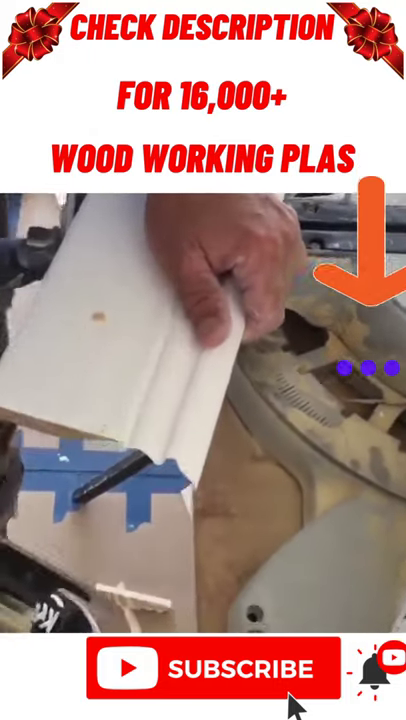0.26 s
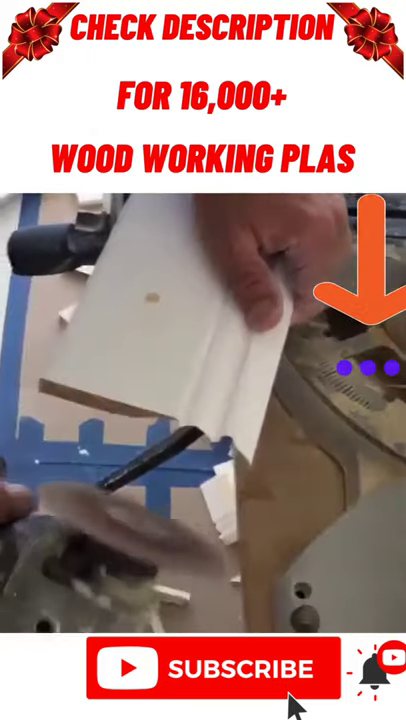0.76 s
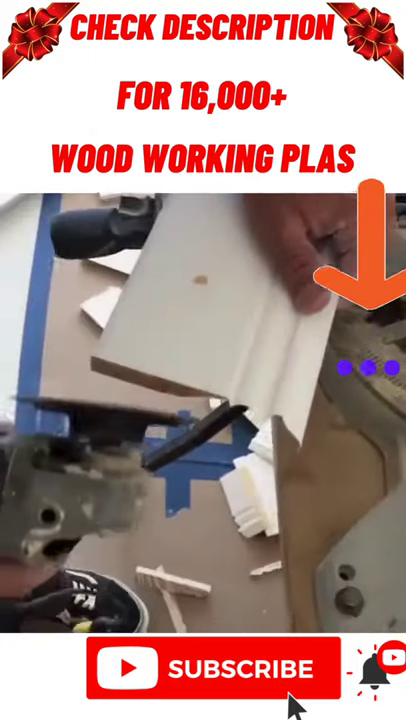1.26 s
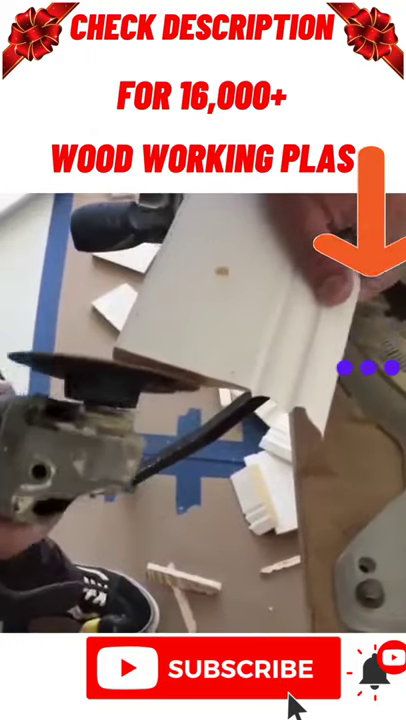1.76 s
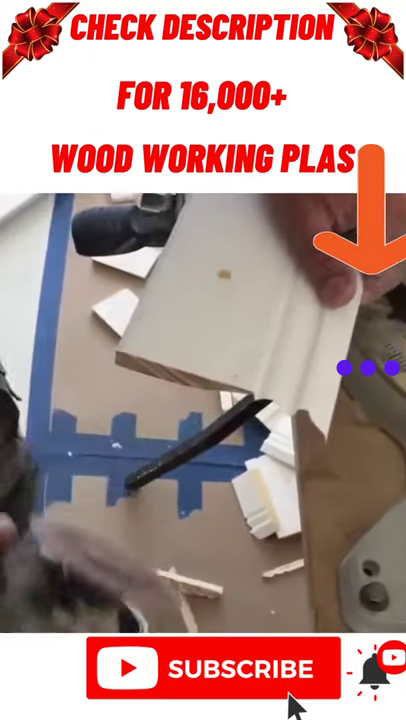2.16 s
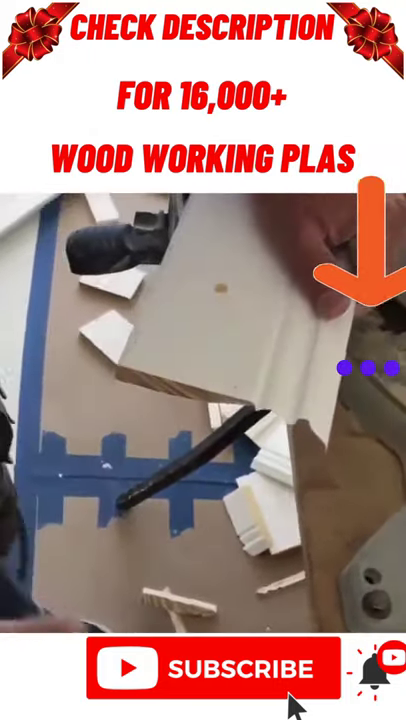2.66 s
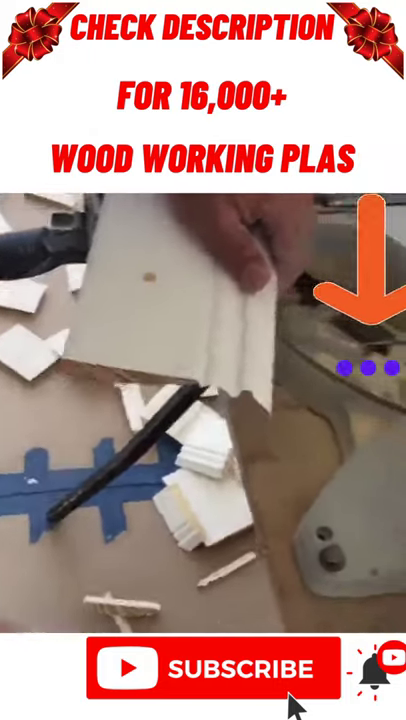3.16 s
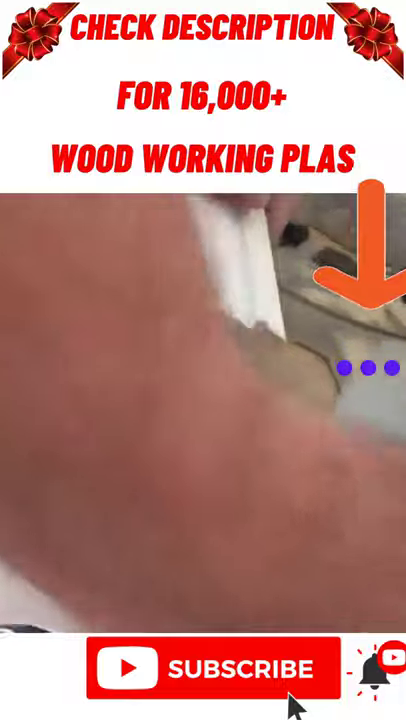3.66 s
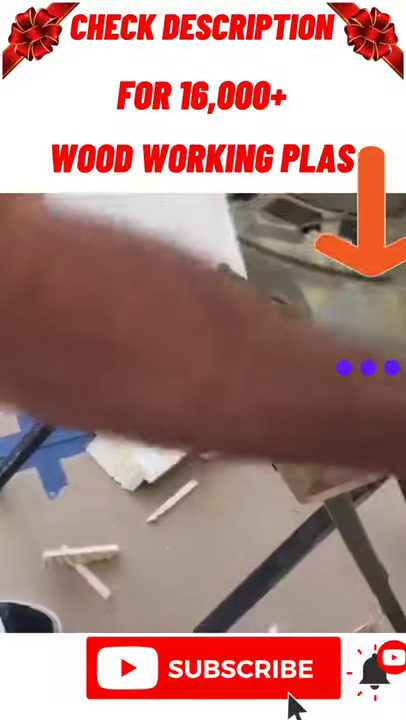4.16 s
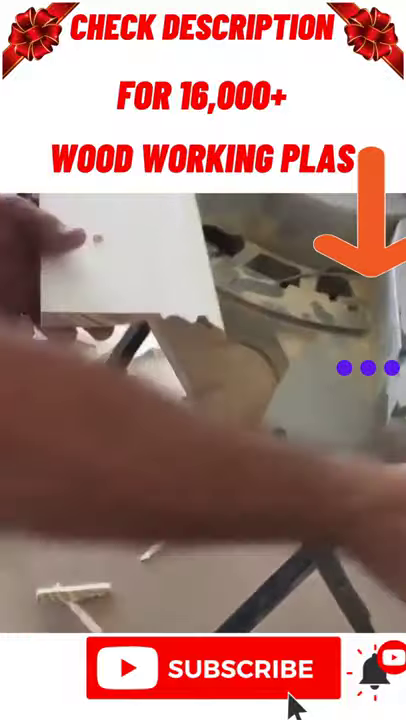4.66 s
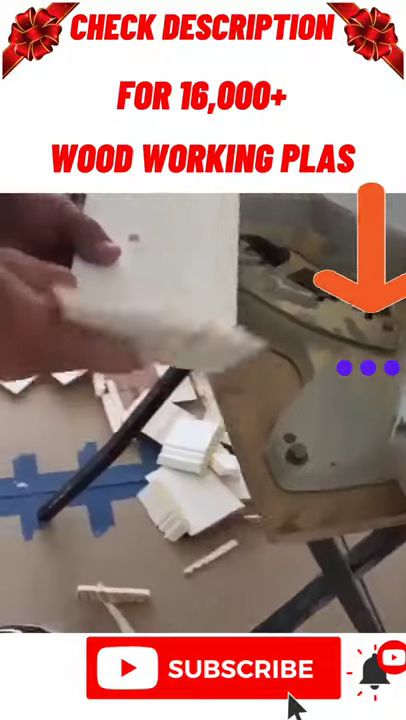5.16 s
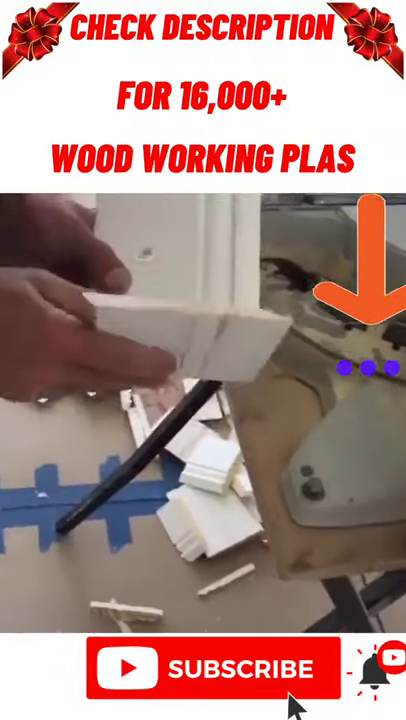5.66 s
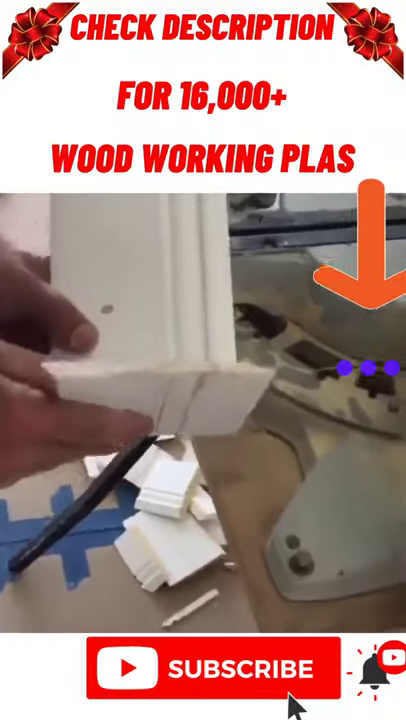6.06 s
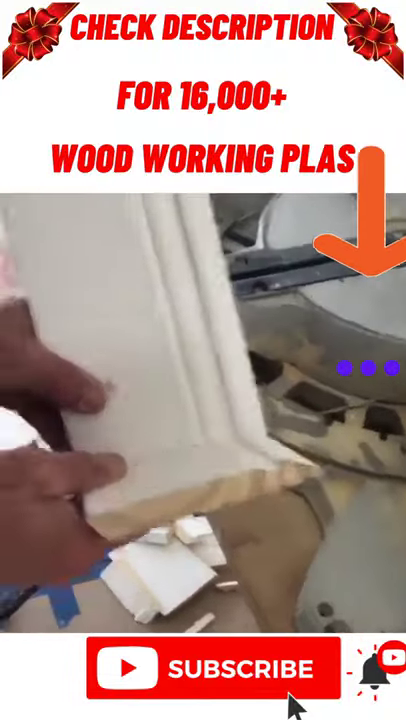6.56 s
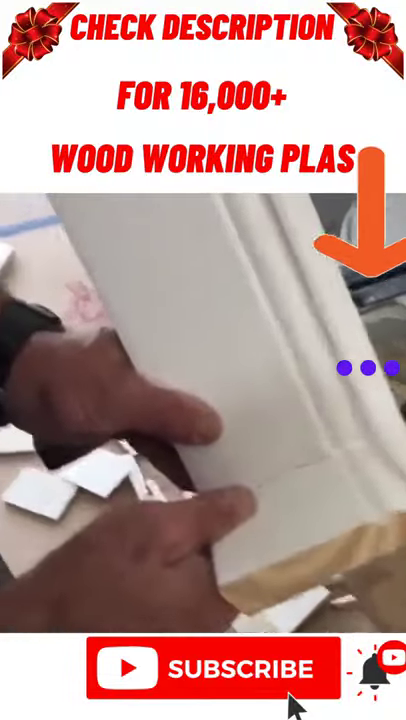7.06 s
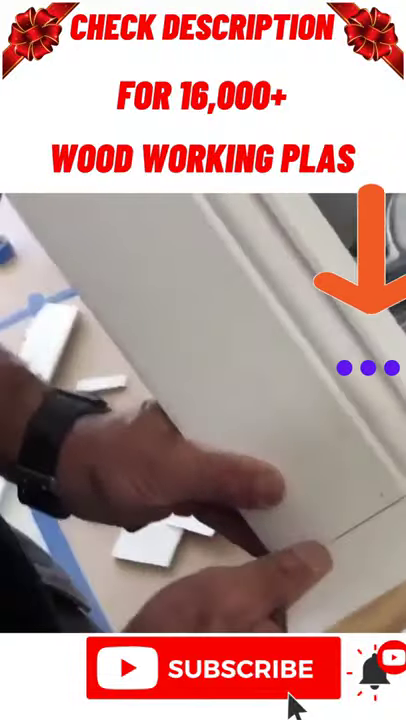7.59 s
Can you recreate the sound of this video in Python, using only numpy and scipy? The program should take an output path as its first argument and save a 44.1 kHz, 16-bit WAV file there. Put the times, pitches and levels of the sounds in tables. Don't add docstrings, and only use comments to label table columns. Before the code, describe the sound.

An airy motor roar with gear whine descends steadily, interrupted by a brief gritty, chattering scrape of disc on wood. Slowing pulses and loose ticks follow until the tool clunks down on a bench and dies. The rest is quiet: faint scrapes, one sharp resonant wood knock, softer taps and dry rustling. Close handheld stereo pickup in a hard, reverberant room, with soft low wind bumps throughout.

```python
import sys
import numpy as np
from scipy import signal
from scipy.fft import rfft, irfft, next_fast_len
from scipy.io import wavfile
from scipy.ndimage import uniform_filter1d, map_coordinates

SR = 44100
rng = np.random.default_rng(int(sys.argv[2]) if len(sys.argv) > 2 else 0)


def undo_db(level):
    steps = np.asarray(level, float) / 20
    return 10 ** steps


def generate_wav(signal):
    frames = np.transpose(np.atleast_2d(signal))
    scaled = np.clip(frames, -1, 1) * 32767
    pcm = np.round(scaled).astype(np.int16)
    wavfile.write(sys.argv[1], SR, pcm)


N = 345152

# t/s, turns per second
DISC_SPEED = [
    (0, 137),
    (1.47, 60.2),
    (1.77, 55),
    (2.5, 34),
    (3.2, 16.7),
]
# f/Hz, level/dB per Hz
FACING = [(470, -45), (800, -15.5), (936, -21), (1140, -3.5), (1350, -7), (1640, -4.5), (1910, -1),
          (2180, -4.5), (2740, -11.5), (3200, -20.5), (4160, -44.5), (7040, -120)]
TURNED = [(470, -41), (800, -8.5), (952, -15), (1330, -6), (1450, -7.5), (1750, -5), (2140, -3),
          (2340, -6.5), (2810, -9), (3510, -10), (4200, -13), (5460, -38), (9240, -120)]
# f/Hz, level/dB per Hz
FAN = [(1650, -26), (2800, -2), (4290, -0.5), (6630, -5.5), (10200, -8), (12300, -8.5), (13100, -13),
       (13500, -34)]
HUM = [(150, -33), (250, -4.5), (388, -12.5), (626, -5.5), (1100, -3.5), (1430, -15.5), (2420, -120)]
# t/s, level/dB
NEAR = [(0, 2.2), (.36, 3.5), (.65, 1.5), (.95, 2), (1.05, 0.5), (1.42, 1), (1.9, -2), (2.05, -1), (2.5, 4),
        (2.8, 5.5), (3.0, 3), (3.19, 0.5)]
# t/s, angle/rad
SWING = [(1.0, 0.00072), (2.4, np.pi / 2)]
# t/s, level/dB
STOP = [(3.2, -2.06), (3.35, -36), (3.6, -100.5)]
# f/Hz, width/Hz, level/dB
GUARD = [(1920, 80, 2.4)]
SHELL = [(1770, 180, 5), (2026, 90, 3), (2380, 160, 6), (3370, 240, -1.5)]
# f/Hz, level/dB
WINDOW = [(3150, -16), (3600, 0), (4300, -1), (4850, 1.5), (5450, -4), (5900, -20), (6600, -29.5),
          (7600, -10), (8200, -31)]
# t/s, level/dB, f/Hz, length/s
STREAKS = [(2.004, -31, 3150, 0.12), (2.246, -44, 1980, 0.14), (2.3, -29, 5300, 0.12),
           (2.318, -27, 3530, 0.07), (2.377, -26, 2230, 0.19), (2.44, -27, 5370, 0.18),
           (2.42, -30, 2540, 0.12), (2.463, -45, 3000, 0.15), (2.653, -35, 2380, 0.14),
           (2.695, -33, 4030, 0.09), (2.843, -36, 5500, 0.11), (2.892, -27, 2380, 0.078),
           (1.958, -23, 1890, 0.098), (2.164, -44, 5100, 0.073), (2.367, -31, 6400, 0.08),
           (2.527, -28, 2400, 0.16), (2.752, -35, 2300, 0.15), (2.9, -31, 3250, 0.097),
           (3.04, -43, 2280, 0.16)]
# t/s, level/dB, hold/s
GUSTS = [(0.013, -22.5, 0.1), (0.497, -17, 0.11), (0.73, -29, 0.0072), (1.068, -33, 0.0091),
         (1.25, -39, 0.46), (2.018, -36.5, 0.02), (2.178, -34.5, 0.12), (2.72, -40, 0.03),
         (3.01, -38.5, 0.035), (3.28, -33.5, 0.25), (3.825, -40.5, 0.087), (4.139, -28, 0.039),
         (4.383, -32.5, 0.21), (4.705, -21, 0.034), (4.846, -24.5, 0.11), (5.067, -32, 0.15),
         (5.326, -19.5, 0.055), (5.466, -44, 0.32), (5.918, -29.5, 0.016), (6.09, -26, 0.032),
         (6.259, -38.5, 0.037), (6.466, -43, 0.11), (6.68, -34, 0.14), (6.911, -36.5, 0.26),
         (7.296, -23.5, 0.034), (7.368, -20.5, 0.064), (7.442, -16, 0.056), (7.597, -42.5, 0.16)]
# t/s, peak level/dB, f/Hz
PUFFS = [(0.062, -18, 117.7), (0.496, -14.5, 100), (0.567, -13, 178), (0.722, -23, 101),
         (1.25, -30.5, 85.4), (2.049, -28.5, 117), (3.25, -20, 174), (4.406, -26, 98.2),
         (4.455, -25.5, 141.3), (4.517, -25, 166), (4.695, -22.5, 92.7), (4.768, -16, 73),
         (4.844, -21, 116), (4.927, -20, 116.6), (5.133, -25, 107), (5.201, -28.5, 112),
         (5.308, -17, 123.8), (5.403, -23, 78.3), (6.073, -25, 113.6), (6.107, -21, 63.7),
         (6.251, -26, 132.5), (6.767, -31, 82.4), (7.12, -31.5, 79.4), (7.212, -26.5, 73.6),
         (7.273, -22, 121.9), (7.313, -21, 99.6), (7.377, -21, 100), (7.453, -22, 142), (7.519, -17, 103),
         (7.559, -18, 97.3)]
# t/s, peak level/dB
FLAPS = [(0.058, -22), (0.499, -20.5), (0.566, -25), (4.831, -30), (4.852, -20), (7.271, -25), (7.295, -43),
         (7.377, -28.5), (7.404, -36.5), (7.452, -13), (7.465, -15), (7.48, -20), (7.513, -24.5),
         (7.564, -49)]
# f/Hz, level/dB per Hz
EDDY = [(12, -41), (20, -12), (55, 10.5), (108, 4.5), (192, -2), (468, -23.5), (507, -23.5), (900, -38.5),
        (1170, -61), (1980, -120)]
QUIET = [(120, -26.5), (200, -11), (316, -4.5), (458, -16.5), (960, -15), (4220, -31.5), (4860, -34),
         (12400, -39.5), (13500, -47.5)]
# f/Hz, width/Hz, level/dB
PORT = [(330, 300, 0.1)]
# t/s, abrasion level/dB
PRESSURE = [
    (1.432, -34.5),
    (1.447, -18.5),
    (1.465, -9.5),
    (1.503, -22),
    (1.538, -10.5),
    (1.56, -18.5),
    (1.62, -14),
    (1.8, -17.5),
    (1.85, -36),
]
# t/s, peak level/dB, board ring level/dB, rim ring level/dB
STRIKES = [(1.4443, -9.5, -6, -9.5), (1.466, -6, 2, -13), (1.484, -8.5, -2, -9), (1.503, -16, 0, -7),
           (1.5196, -6.5, -1.5, -7), (1.5402, -7.5, -1.5, -8.5), (1.559, -13.5, 1, -10),
           (1.579, -10, -2.5, -5), (1.599, -7.5, 0, -4.5), (1.6188, -4.5, -1.5, -6.5),
           (1.6427, -8, 1.5, -5.5), (1.6613, -9, 0.5, -5.5), (1.682, -6.5, -0.5, -3),
           (1.7027, -4.5, -9, -2.5), (1.7246, -5, -11, -2), (1.7476, -7.5, -4, -2),
           (1.772, -9.5, -6.5, -3.5), (1.795, -16.5, -7, -5.5), (1.819, -20.5, -6.5, -4.5)]
# f/Hz, level/dB per Hz
GRIT = [(150, -55), (250, -16.5), (791, -11.5), (1000, -17.5), (1350, -18), (1680, -1), (1950, -7),
        (2950, -8), (3670, -11.5), (4490, -9.5), (8320, -13), (12600, -17), (13500, -27)]
# f/Hz, width/Hz, level/dB
BOARD = [(1637, 90, 4.5), (2180, 110, -0.5), (2781, 90, -7), (4660, 120, -8), (5960, 220, -9)]
RIM = [(3400, 60, -9.5), (3710, 90, 1), (3970, 55, -3), (4060, 63, 1.5)]
DRONE = [(794, 300, 0)]
# t/s, peak level/dB, f/Hz, snap level/dB
TICKS = [(1.9338, -26, 3700, -15), (1.95, -23.5, 1890, -19.5), (2.118, -24, 3303, -1.5),
         (2.155, -29, 3250, -15), (2.2176, -27, 3400, -14.5), (2.3337, -20, 2240, -2.5),
         (2.4591, -27, 3700, -10), (2.483, -29, 4500, -7.5), (2.491, -18.5, 2390, -15.5),
         (2.5785, -25.5, 1770, -15.5), (2.601, -26.5, 2470, -15), (2.69, -26.5, 1760, -15),
         (2.76, -19.5, 1770, -20.5), (2.8153, -29, 2070, -9.5), (2.9355, -29, 3380, -16),
         (2.9749, -28.5, 3840, -19), (2.989, -27.5, 3600, -12.5), (2.9903, -23, 1793, -10),
         (3.511, -34.5, 2090, -5.5), (3.5517, -34, 1734, -4), (3.6699, -35, 1750, -5),
         (3.6994, -36.5, 1780, -4), (3.9, -47, 1750, -5.5), (4.055, -42, 560, -26),
         (4.204, -36, 640, -20.5), (4.3124, -44, 2830, -5), (4.705, -22.5, 2740, -2.5),
         (6.4736, -53, 3650, 3), (6.6317, -44.5, 3523, 4), (6.9318, -43, 1250, -2)]
# f/Hz, width/Hz, level/dB
SNAP = [(6500, 1200, 3.5), (4200, 6200, -4.0), (11000, 4000, -10)]
# t/s, peak level/dB, knock f/Hz, thud level/dB, thud f/Hz
KNOCKS = [(3.211, -19, 830, 3.5, 440), (3.253, -18.5, 1230, -5, 500), (3.262, -5.5, 1350, -13.5, 693),
          (3.269, -9, 1430, -12, 670), (3.288, -13, 1520, -8, 392), (3.3101, -22, 1420, -11, 700),
          (3.3564, -20, 1300, -7, 620), (3.3847, -24.5, 1270, 1, 611), (3.302, -17, 1650, -10, 700),
          (3.325, -20.5, 1900, -6.5, 640), (3.415, -25.5, 1600, -7, 600), (4.5594, -9.5, 1516, -13.5, 684),
          (4.5683, -19.5, 1450, -13, 804), (4.5885, -22.5, 1080, -15, 786), (5.1898, -20.5, 747, -7.5, 700),
          (5.3124, -28.5, 766, -8.5, 730), (5.6332, -40.5, 1160, -5.5, 708), (5.835, -28.5, 696, -2, 300)]
# f/Hz, width/Hz, level/dB
CRACK = [(4120, 600, 5.0), (3000, 1200, 2.5), (5966, 500, -0.5), (8000, 6200, -16.5)]
PLANK = [(796, 27, -10.5), (1012, 28, 0), (1484, 120, 4), (1980, 90, -13), (2466, 150, -2.5),
         (2870, 140, -8)]
OFFCUT = [(730, 53, -2), (1154, 42, 6), (1683, 85, 1.5), (2280, 110, 2.5), (2690, 80, -5), (3020, 110, -6)]
# t/s, scrape level/dB, stroke/s, edge squeak level/dB
SLIDES = [(3.58, -50.5, 0.13, -3.5), (3.75, -54, 0.085, -11.5), (3.902, -60, 0.045, -11),
          (4.055, -63.5, 0.042, -23), (4.204, -53, 0.049, -14), (4.32, -50.5, 0.029, -2.5),
          (4.43, -52, 0.038, -8.5), (4.547, -52.5, .003, -5), (4.95, -65.5, 0.11, -2.5),
          (5.106, -66, 0.0024, 0), (5.178, -61, .003, 2), (5.45, -67, 0.13, 5), (5.648, -60, 0.015, 5),
          (5.765, -67, 0.096, -19), (5.8, -68, 0.044, 11.5), (6.934, -62.5, 0.014, 1.5)]
# t/s, rustle level/dB, t60/s
RUSTLE = [(3.272, -34, .52), (3.512, -50, .7), (3.672, -57, 0.84), (3.899, -69.5, 0.23),
          (4.326, -58.5, .55), (4.56, -46.5, .7), (4.701, -53.5, .2), (4.827, -62.5, 0.64),
          (5.108, -61.5, 0.7), (5.19, -64.5, .9), (5.307, -66, 1.4), (5.58, -62, .6), (5.647, -61, .3),
          (5.829, -54, 0.15), (6.634, -59.5, 0.072), (6.93, -56, 0.36)]
# f/Hz, width/Hz, level/dB
GROOVE = [(639, 240, 7), (1550, 330, 4)]
EDGE = [(2350, 190, -0.5), (2933, 79, 6.5), (3600, 170, -5), (4510, 130, -5)]
# f/Hz, level/dB
DRY = [(1500, -24.0), (3500, 8.5), (6000, 1.0), (13000, -3.0)]
# f/Hz, t60/s
ROOM = [(300, 0.96), (1500, 0.83), (2300, 0.86), (4000, 0.29), (10000, 0.32)]
# t/s, level/dB
WET = [(3.9, -3), (4.0, -12), (5.0, -4.5), (5.1, -10.5)]
# f/Hz, side minus mid level/dB
WIDTH = [(3300, -70), (4300, -13), (5500, -4), (7500, -3), (9500, -3), (13000, -3.5)]


def unit(x):
    return x / np.sqrt(np.mean(x ** 2) + 1e-20)


def curves(rows, outside=None):
    s, *cols = np.transpose(rows)
    return [np.interp(np.arange(N) / SR, s, c, outside, outside) for c in cols]


def wobble(rate):
    knots = rng.standard_normal(int(N * rate / SR) + 4)
    return map_coordinates(knots, [np.arange(N) * rate / SR])


def filtered(x, response):
    m = next_fast_len(N + SR // 2)
    return irfft(rfft(x, m) * response(np.fft.rfftfreq(m, 1 / SR)), m)[..., :N]


def colour(points):
    f, db = np.transpose(points)
    return lambda hz: undo_db(np.interp(np.log(hz + 1), np.log(f + 1), db))


def modes(peaks):
    def response(f):
        total = 0
        for k, (centre, width, db) in enumerate(peaks):
            resonance = 1j * f * width / (centre * centre - f * f + 1j * f * width)
            total = total + (-1) ** k * undo_db(db) * resonance
        return total
    return response


def noise(response, grain_db, patchy_db=2.5):
    z = signal.stft(undo_db(grain_db * wobble(300)) * rng.standard_normal(N), nperseg=512)[2]
    field = uniform_filter1d(rng.standard_normal(z.shape), size=5, axis=0)
    field = uniform_filter1d(field, size=10, axis=1)
    patchy = signal.istft(z * undo_db(patchy_db * unit(field)), nperseg=512)[1][:N]
    return unit(filtered(patchy, response))


def tap(response, rise):
    t = np.arange(4096) / SR
    sound = irfft(response(np.fft.rfftfreq(len(t), 1 / SR)), len(t))
    sound = sound * (1 - np.exp(-t / rise)) ** 2
    return sound / np.max(np.abs(sound))


def blow(response, rise, t60):
    t = np.arange(4096) / SR
    push = undo_db(-60 * t / t60) * (1 - np.exp(-t / rise)) ** 2 * rng.standard_normal(len(t))
    sound = irfft(rfft(push) * response(np.fft.rfftfreq(len(t), 1 / SR)), len(t))
    return sound / np.max(np.abs(sound))


def add(out, s, sound):
    part = out[max(round(s * SR), 0):][:len(sound)]
    part += sound[:len(part)]


def swells(s, db, hold, rise, fall):
    t = np.arange(0, N / SR, 0.001)[:, None]
    climb_db = rise * np.maximum(s - t, 0)
    decay_db = fall * np.maximum(t - s - np.abs(hold), 0)
    gain = undo_db(db - climb_db - decay_db).sum(axis=1)
    return np.interp(np.arange(N) / SR, t[:, 0], gain)


def motor():
    gearing = 3.7
    turns, = curves(DISC_SPEED)
    speed_db = 20 * np.log10(turns / turns[0])
    near_db, = curves(NEAR)
    housing_db = -25.12 + speed_db + near_db
    fan_db = -25 + 1.193 * speed_db
    hum_db = np.maximum(-31.5 + 1.54 * speed_db, -50.5)
    throb_db = 70 / turns * np.cos(2 * np.pi * np.cumsum(turns) / SR)

    motor_turn = np.floor(np.cumsum(gearing * turns) / SR)
    taps = np.diff(motor_turn, prepend=0) * undo_db(2.5 * wobble(90))
    near = noise(lambda f: colour(FACING)(f) * (0.94 + np.abs(modes(GUARD)(f))), 0.24)
    near = near + 0.26 * unit(filtered(taps, colour(FACING)))
    far = noise(lambda f: colour(TURNED)(f) * (1.3 + np.abs(modes(SHELL)(f))), 1.0)
    far = far + 0.32 * unit(filtered(taps, colour(TURNED)))
    brush = unit(filtered(1.0 * (taps > 0), lambda f: modes(SHELL)(f) ** 2))
    far = far + undo_db(-5 + 1.4 * wobble(14)) * brush

    angle, = curves(SWING)
    housing = np.cos(angle) * near + np.sin(angle) * far
    roar = undo_db(housing_db + throb_db) * housing
    roar = roar + undo_db(fan_db + 0.41 * throb_db) * noise(colour(FAN), 0.93)
    hum = undo_db(hum_db) * noise(colour(HUM), 1.3)
    stop_db, = curves(STOP)
    return undo_db(stop_db) * (roar + hum)


def whine():
    now = np.minimum(np.arange(N) / SR, 1.6)
    mesh_hz = 2178 - 790 * now + 60 * now ** 2
    level_db = -32 - 3.5 * now - 900 * np.maximum(now - 1.42, 0)
    phase = 2 * np.pi * np.cumsum(mesh_hz * (1 + 0.004 * wobble(70))) / SR
    out = np.zeros(N)
    for order in (2, 3, 6):
        order_db = level_db - 3.5 * (order == 2) + 2.5 * wobble(25)
        out += colour(WINDOW)(order * mesh_hz) * undo_db(order_db) * np.sin(order * phase)

    flutter = 1 + 0.005 * wobble(60)
    for s, db, hz, length in STREAKS:
        t = np.arange(round(length * SR)) / SR - length / 2
        moving = flutter[round(s * SR):][:len(t)]
        glide_hz = hz * (1 - 0.95 * t) * moving
        waver_db = -9 + 600 * (moving - 1)
        tone = np.hanning(len(t)) * np.sin(2 * np.pi * np.cumsum(glide_hz) / SR)
        add(out, s - length / 2, undo_db(db + waver_db) * tone)
    return out


def room_tone():
    return undo_db(-60.5 + 0.8 * wobble(4)) * noise(colour(QUIET), 0.6)


def wind():
    buffet = unit(undo_db(3 * wobble(30)) * noise(colour(EDDY), 0.6))
    lull = undo_db(-52.5)
    out = undo_db(-4.0) * (lull + swells(*np.transpose(GUSTS), rise=300, fall=280)) * buffet
    t = np.arange(SR // 16) / SR
    for (s, db, hz), twist in zip(PUFFS, rng.uniform(0, 2 * np.pi, len(PUFFS))):
        cycles = t * hz - 0.9
        swing = np.exp(-(cycles / 0.4) ** 2) * np.cos(2 * np.pi * cycles + twist)
        add(out, s - 0.19 / hz, undo_db(db + 4.0) * swing)
    edge = lambda f: modes(PORT)(f) / (1 + 1j * f / 600) ** 4
    for s, db in FLAPS:
        add(out, s - 0.002, undo_db(db + 1.0) * blow(edge, 0.0028, 0.039))
    return out


def graze():
    t = np.arange(N) / SR
    press_db, = curves(PRESSURE, -120)
    turn = np.interp(t, [row[0] for row in STRIKES], np.arange(len(STRIKES)))
    grit = noise(colour(GRIT), 1.4)
    late = np.clip((t - 1.66) / 0.046, 0, 1)
    sing = undo_db(-5) * unit(filtered(grit, modes(RIM)))
    drone = undo_db(-14.5) * unit(filtered(grit, modes(DRONE)))
    swell_db = 1 * np.cos(2 * np.pi * turn - 0.6)
    out = undo_db(press_db - 5.0 + swell_db) * (grit + late * (sing + drone))
    for s, db, board_db, rim_db in STRIKES:
        bite = undo_db(board_db) * tap(modes(BOARD), 0.002)
        bite = bite + undo_db(rim_db) * blow(modes(RIM), 0.002, 0.015)
        crunch = undo_db(-9) * blow(colour(GRIT), 0.002, 0.059)
        add(out, s - 0.0015, undo_db(db - 2.5) * (bite + crunch))
    return out


def ticks():
    out = np.zeros(N)
    for s, db, hz, snap_db in TICKS:
        snap = blow(modes(SNAP), 0.0005, 0.022)
        ring = tap(modes([(hz, 0.036 * hz, 0)]), 0.00092)
        add(out, s, undo_db(db - 3.0) * (ring + undo_db(snap_db + 1.5) * snap))
    return out


def knocks():
    out = np.zeros(N)
    soft = lambda f, hz: 1 / (1 + 1j * f / hz) ** 2
    for s, db, hz, thud_db, thud_hz in KNOCKS:
        crack_db = -12 if s < 4 else -23.5
        low = modes([(thud_hz, 0.14 * thud_hz, 0.1)])
        thud = tap(lambda f: low(f) * soft(f, 1600) * f / (f + 1j * 0.55 * thud_hz), 0.0012)
        wood = modes([(0.65 * hz, 0.15 * hz, -5), (hz, 0.33 * hz, 2),
                      (1.4 * hz, 0.14 * hz, -1.5), (1.646 * hz, 0.78 * hz, -9)])
        knock = tap(lambda f: wood(f) * soft(f, 4000), 0.0009)
        crack = blow(modes(CRACK), 0.0017, 0.03)
        piece = modes(OFFCUT if s > 5 else PLANK)
        ring = (4 < s < 5.5) * tap(lambda f: piece(f) * soft(f, 3000), 0.001)
        contact = knock + undo_db(-1.0) * ring + undo_db(thud_db) * thud + undo_db(crack_db) * crack
        add(out, s, undo_db(db + 3.0) * contact)
    return out


def slides():
    s, db, stroke, edge_db = np.transpose(SLIDES)
    groove = noise(lambda f: modes(GROOVE)(f) / (1 + (f / 3000) ** 4), 1.1, patchy_db=2.0)
    squeak = noise(lambda f: modes(EDGE)(f) / (1 + (f / 5000) ** 4), 1.1, patchy_db=2.0)
    out = undo_db(5.0) * swells(s, db, stroke, rise=400, fall=230) * groove
    out = out + swells(s, db + edge_db, stroke, rise=400, fall=230) * squeak
    rustle = noise(colour(DRY), 2.6, patchy_db=4.0)
    s, db, t60 = np.transpose(RUSTLE)
    return out + swells(s, db, 0, rise=680, fall=60 / t60) * rustle


def room(x):
    hz, t, z = signal.stft(rng.standard_normal(SR), SR, nperseg=256)
    wall_hz, wall_t60 = np.transpose(ROOM)
    t60 = np.interp(np.log(hz + 1), np.log(wall_hz), wall_t60)
    tail = signal.istft(z * undo_db(-60 * t / t60[:, None]), SR, nperseg=256)[1]
    late = np.pad(x, (200, 0))
    return signal.fftconvolve(late, tail / np.linalg.norm(tail))[:N]


def scene():
    hits = knocks()
    light = graze() + ticks()
    wet_db, = curves(WET)
    echo = room(undo_db(wet_db) * hits + undo_db(-12) * light)
    mid = motor() + whine() + room_tone() + wind() + light + hits + slides() + echo
    return np.array([mid, mid])


def band_limit(x):
    return signal.sosfilt(signal.butter(12, 14410, fs=SR, output="sos"), x)


def record(dry):
    z = signal.stft(dry[0], nperseg=256)[2]
    loose = signal.istft(z * np.exp(2j * np.pi * rng.random(z.shape)), nperseg=256)[1][:N]
    side = filtered(loose, colour(WIDTH))
    heard = filtered(dry + [side, -side], lambda hz: (hz < 13110) / (1 + (40 / (hz + 1)) ** 3))
    return band_limit(heard)


dry = scene()
out = record(dry)
generate_wav(out)
```